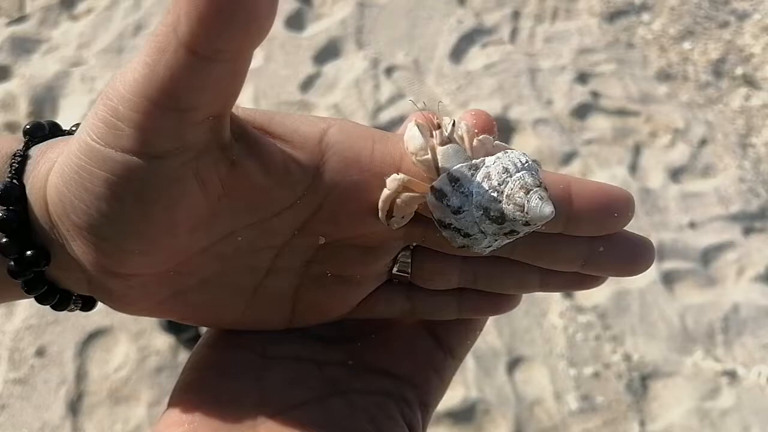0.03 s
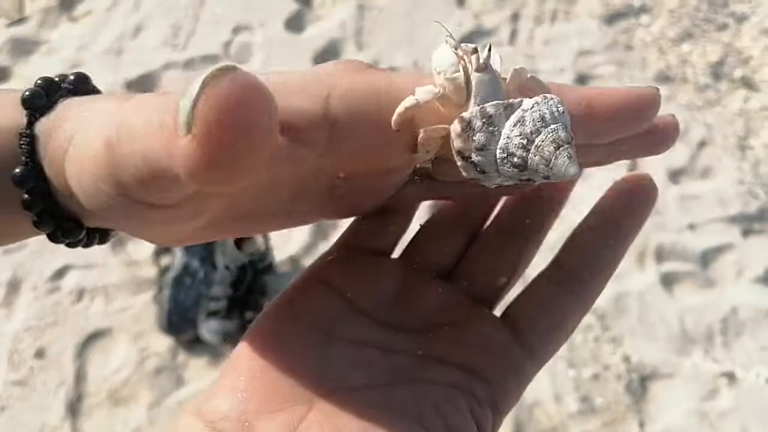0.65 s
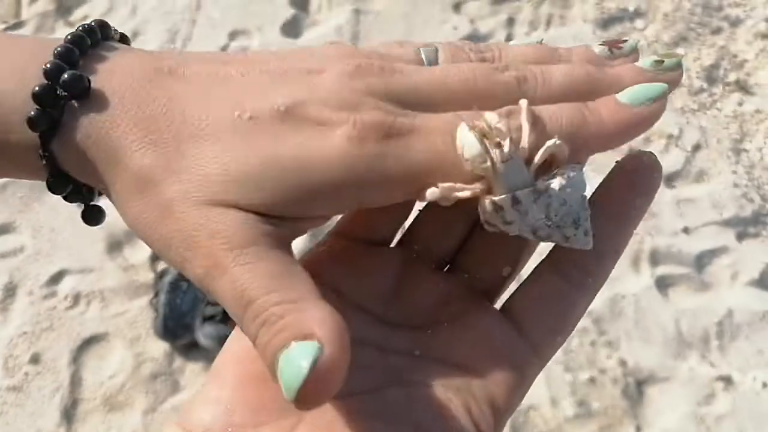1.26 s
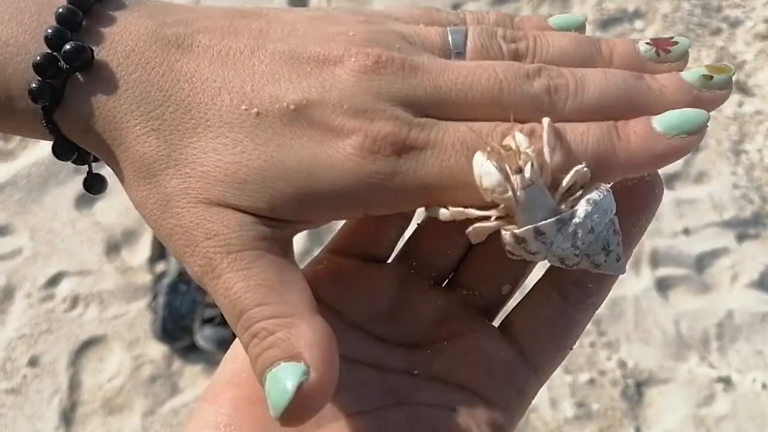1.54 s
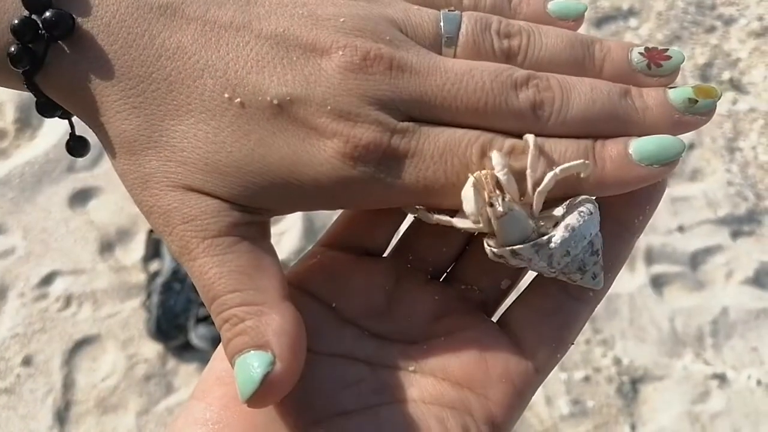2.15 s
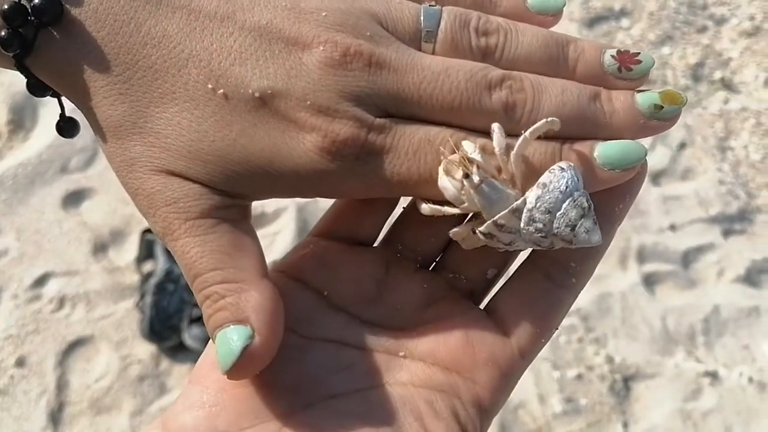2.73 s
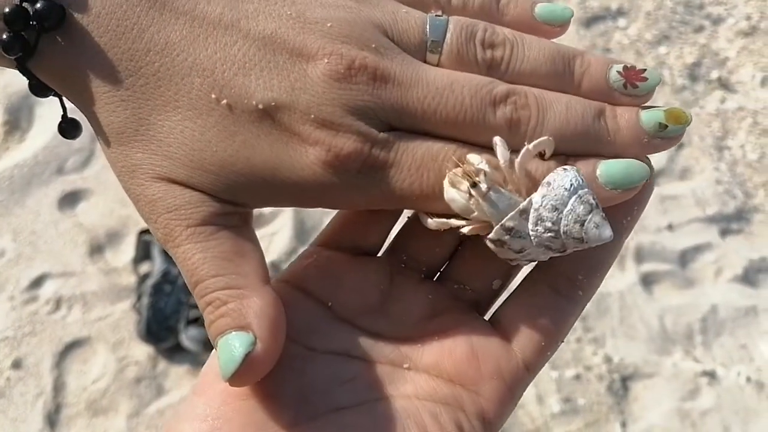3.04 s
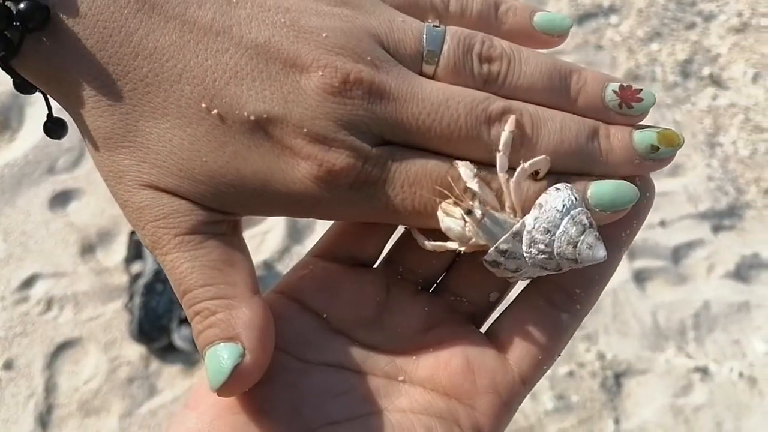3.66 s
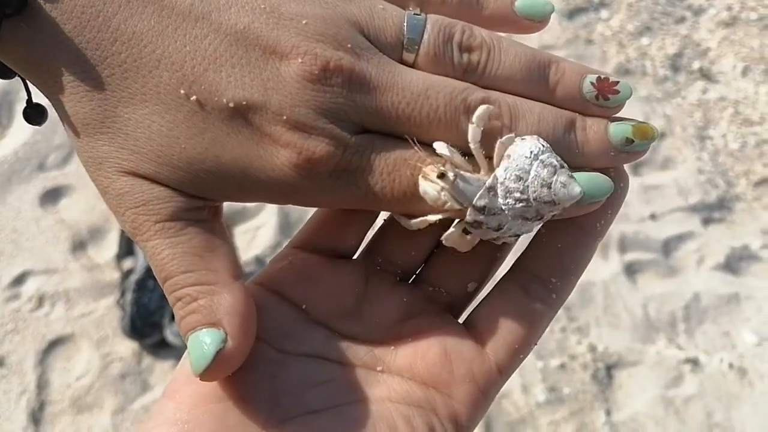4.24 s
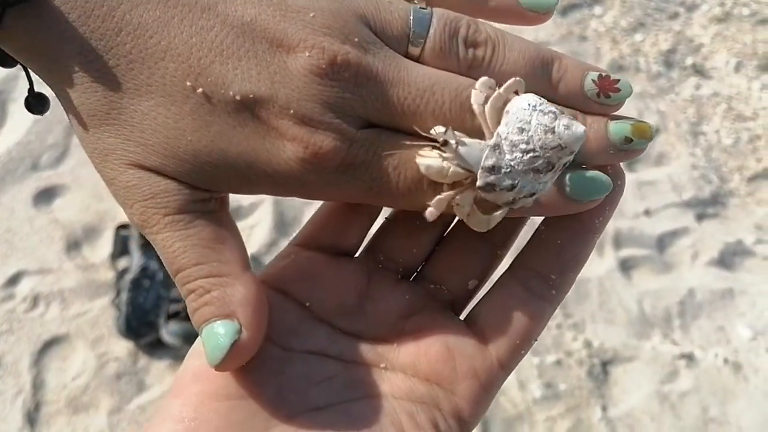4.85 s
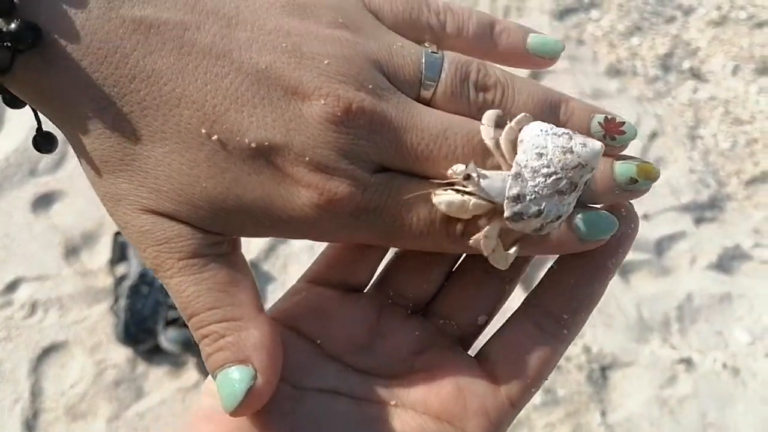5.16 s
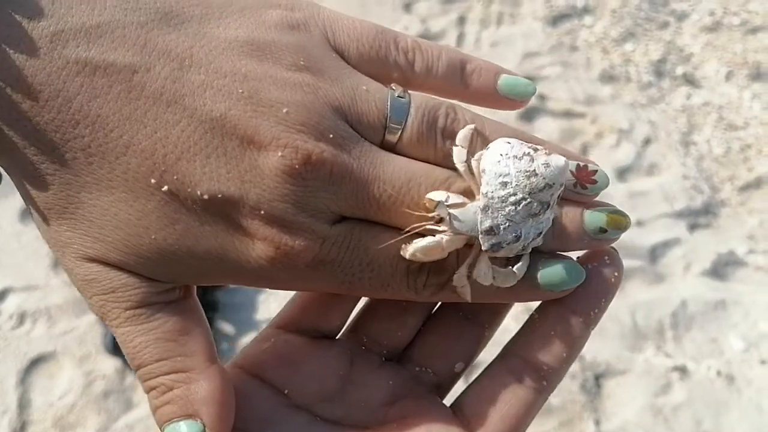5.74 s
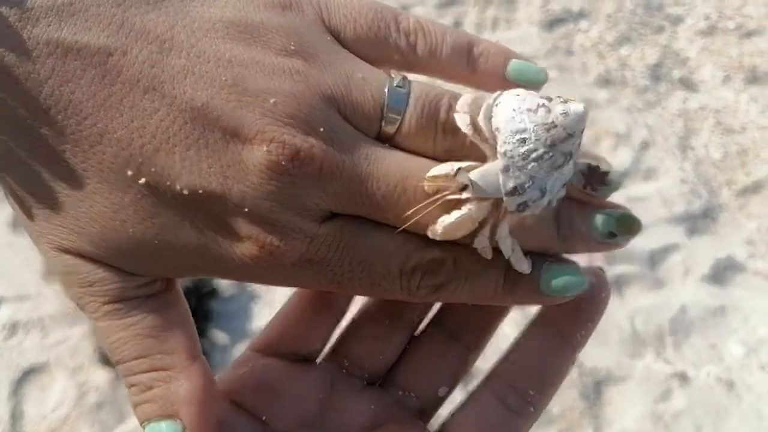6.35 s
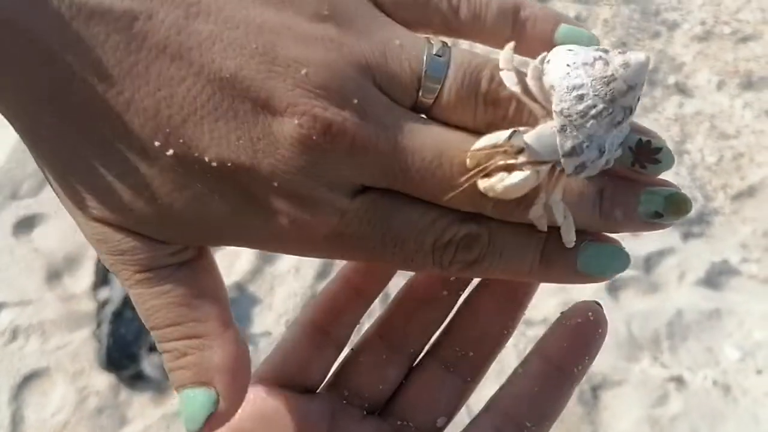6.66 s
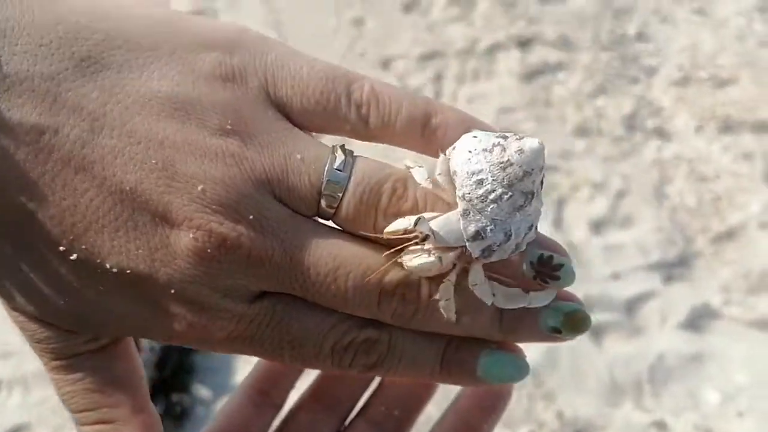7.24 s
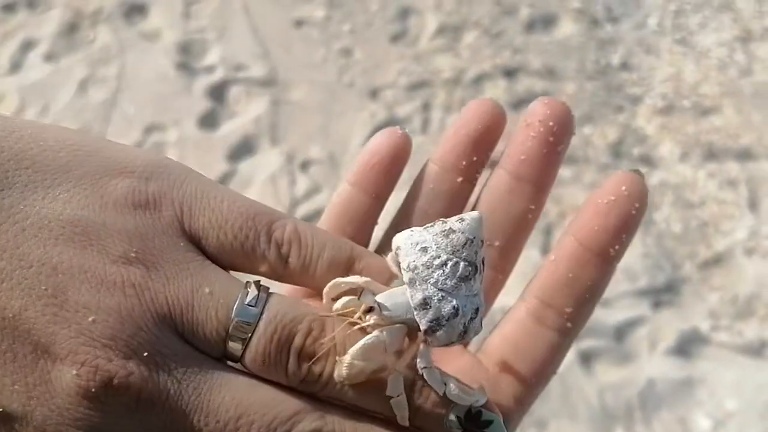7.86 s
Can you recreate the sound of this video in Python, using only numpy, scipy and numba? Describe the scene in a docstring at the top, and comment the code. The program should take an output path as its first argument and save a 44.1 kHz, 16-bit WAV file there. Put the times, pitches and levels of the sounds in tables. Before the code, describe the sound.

Small waves break and hiss on a sandy beach while gusts of wind flutter and thump against the microphone.

```python
"""Small waves on a windy, sandy beach, heard from a hand-held phone with two microphone ports.
After half a second of silence the sound opens on breaking waves: each booms, roars, washes and leaves
hissing foam, reaching one port a moment before the other. Gentler waves follow, while gusts shed eddies
across each port on its own in a low flutter. A faint tick passes at 4.3 s. From about 5.5 s the wind
stiffens, opens up and thumps; it is strongest in the final second, as one last wave breaks."""
import sys
import numpy as np
from scipy import signal
from scipy.fft import rfft, irfft
from scipy.io import wavfile
from scipy.ndimage import uniform_filter1d, minimum_filter1d
from numba import njit

SR = 44100
rng = np.random.default_rng(int(sys.argv[2]) if len(sys.argv) > 2 else 0)


def transcribe(signal):
    """Save signal, clipped to [-1, 1], as a 16-bit WAV file at the path in sys.argv[1]."""
    frames = np.atleast_2d(signal).T
    limited = np.clip(frames, -1, 1)
    pcm = np.round(limited * 32767).astype(np.int16)
    wavfile.write(sys.argv[1], SR, pcm)


N = 352800
TIME = np.arange(N) / SR
SLOW_TIME = TIME[::100]  # coarse clock for slow envelopes
FREQ = np.maximum(np.arange(N // 2 + 1) * SR / N, 1)

# gusts that strike one port: (time [s], port [-1 left, 1 right], level [dB], half length [s])
GUSTS = [(0.64, 1, -32.5, 0.019), (.648, -1, -44, 0.03), (0.98, 1, -41.5, 0.078), (1.29, -1, -45, .03),
         (1.441, -1, -45, 0.038), (1.68, -1, -37.5, 0.014), (1.753, 1, -39, .03), (1.92, -1, -42, 0.04),
         (2.004, -1, -41.5, .015), (2.036, -1, -38, .015), (2.218, 1, -40, 0.026),
         (2.343, -1, -41.5, 0.028), (2.448, 1, -43.5, 0.015), (2.681, -1, -41.5, .025),
         (3.133, -1, -36.5, .016), (3.32, 1, -45, 0.023), (3.623, 1, -43, 0.019), (3.893, -1, -34.5, .022),
         (4.003, -1, -38.5, .06), (4.181, 1, -40, 0.035), (4.236, -1, -42.5, 0.023),
         (4.47, -1, -42.5, 0.047), (4.74, 1, -42.5, 0.028), (5.208, -1, -45, 0.013), (5.251, 1, -40, .04),
         (5.418, 1, -38.5, 0.018), (5.468, 1, -39.5, .025), (5.576, 1, -41.5, 0.014), (5.635, 1, -30, .04),
         (5.718, 1, -33.5, 0.018), (5.809, -1, -32, 0.016), (5.845, 1, -32, 0.038), (6.094, 1, -37, 0.019),
         (6.125, -1, -41, 0.045), (6.207, 1, -36, 0.026), (6.42, 1, -37, 0.045), (6.556, -1, -40.5, 0.053),
         (6.69, 1, -41, 0.052), (7.035, -1, -45, 0.033), (7.238, -1, -33, .018), (7.28, -1, -31, .018),
         (7.296, 1, -32, 0.062), (7.393, -1, -26.5, 0.022), (7.451, 1, -29, 0.037), (7.581, 1, -25, .013),
         (7.672, -1, -34, 0.035), (7.719, 1, -30, 0.021), (7.79, -1, -34.5, 0.021),
         (7.848, 1, -35.5, 0.019), (7.965, 1, -35.5, 0.032)]
# breaking waves: (crest [s], rise [s], hold [s], fall [s], side [-1 left to 1 right],
# boom [dB], roar [dB], wash [dB], foam [dB], peak pitch [Hz], hollow pitch [Hz])
WAVES = [(.42, 0.067, 0.29, .2, -0.24, 13.5, 6, 12.5, 14, 5850, 1500),
         (0.746, 0.1, .13, .42, 0.13, 10, 5.5, 9, 8, 1900, 4300),
         (1.307, .13, 0.31, 1.14, -0.7, 1.4, 0, 3, -1.5, 6100, 2130),
         (2.31, 0.13, 0.045, 0.72, -0.82, -5, -2.5, 0.5, -1, 4360, 570),
         (2.89, .33, 0.44, 0.23, -0.42, -0.5, 2.5, 1.5, 0.5, 7600, 600),
         (3.332, 0.13, 0.6, 0.074, 0.13, 3.2, -2, 2.5, -1.5, 3000, 1390),
         (3.72, .08, .14, .04, .1, -6, -5, 0, -5, 2800, 1400),
         (3.994, 0.17, 0.23, 0.68, -0.18, 0.5, -8, 0.8, -3, 2800, 1450),
         (5.02, 0.97, .35, 0.46, 0.81, -3.5, -4.5, 1.5, -1.1, 5480, 470),
         (5.676, 0.12, 0.23, 0.3, 0.47, -3, -7, -3, -6, 600, 900),
         (6.364, 0.14, .14, .16, -1.04, 2.5, 3, 3.5, 5, 3210, 9900),
         (6.775, 0.32, 0.12, .85, .9, -10.5, -11.5, -7.5, -4, 1350, 670),
         (7.886, .14, .15, 0.21, -0.16, 8, 5.5, 9, 4.5, 2700, 1700)]


def undb(db):
    """Decibels to gain."""
    return 10 ** (np.asarray(db) / 20)


def curves(table):
    """The columns of a table, joined by straight lines in time."""
    times, *columns = np.transpose(table)
    return np.array([np.interp(TIME, times, column) for column in columns])


def spectra(table, hz=FREQ):
    """The columns of a table, joined by straight lines in log frequency."""
    points, *columns = np.transpose(table)
    return np.array([np.interp(np.log(hz), np.log(points), column) for column in columns])


def walk(rate_hz):
    """A smooth random wobble: levels held 1 / rate_hz seconds and slewed twice, spread near 1."""
    step = max(int(SR / rate_hz), 1)
    held = np.repeat(rng.standard_normal(N // step + 2), step)
    slewed = uniform_filter1d(uniform_filter1d(held, step), step)
    return 1.3 * slewed[rng.integers(step):][:N]


def steady(x, span_s):
    """Hold a noise near rms 1 over spans of this length, keeping its faster flutter."""
    span = max(int(span_s * SR), 1)
    return x / np.sqrt(uniform_filter1d(uniform_filter1d(x ** 2, span), span) + 1e-18)


@njit
def lowpass(x, hz, damping):
    """State-variable low-pass whose corner and damping move every sample."""
    y, band, low = np.empty(len(x)), 0., 0.
    for i in range(len(x)):
        g = np.tan(np.pi * hz[i] / SR)
        v = (band + g * (x[i] - low)) / (1 + g * (g + damping[i]))
        y[i] = low + g * v
        band, low = 2 * v - band, 2 * y[i] - low
    return y


def sand_tick(at_s=4.2812, left_db=-45, right_db=-53, decay_s=0.00032, low_cut_hz=7000):
    """A faint, bright tick, like a grain of sand blown against the phone."""
    age = TIME - at_s
    burst = rng.standard_normal((2, N)) * (age > 0) * np.exp(-np.abs(age) / decay_s)
    low_cut = signal.butter(2, low_cut_hz, "high", fs=SR, output="sos")
    return undb([[left_db], [right_db]]) * signal.sosfilt(low_cut, burst)


def wind_pressure(port, waver_db=4.0, waver_hz=15):
    """Wind level in dB at one port: a wavering breeze, and gusts that swell and pass."""
    # the breeze, and which port faces it: (time [s], level [dB], right minus left [dB])
    breeze = [(.5, -53, 2), (1.05, -51.5, 6), (1.25, -56, -6), (2.3, -53.5, -3), (2.95, -57, 5),
              (3.2, -52.5, 2), (4.25, -52.5, 1), (4.6, -56.5, -4), (5.1, -53.5, -1), (5.4, -46, 3.5),
              (6.0, -51, 8), (6.7, -54.5, 9.5), (7.17, -53, -8), (7.3, -40.5, -2.5), (8, -40, 5.5)]
    breeze_db, facing_db = curves(breeze)
    breeze_power = undb(breeze_db + port * facing_db / 2 + waver_db * walk(waver_hz)) ** 2
    gust_power = sum((undb(db) * np.exp(-((SLOW_TIME - at_s) / half_s) ** 2 / 2)) ** 2
                     for at_s, struck, db, half_s in GUSTS if struck * port > 0)
    return 10 * np.log10(breeze_power + np.interp(TIME, SLOW_TIME, gust_power))


def wind_flutter(pressure_db, colour_db, corner_hz=235, usual_db=-40, db_per_octave=23,
                 clump_db=5.5, usual_damping=1.46, damping_per_db=0.03, trim_db=1.54):
    """Eddies pass one port in clumps; faster air makes them louder, shorter and more alike in size."""
    eddies = rng.standard_normal(N) * undb(clump_db * walk(rate_hz=90))
    body = irfft(rfft(eddies) * undb(colour_db), N)
    excess_db = pressure_db - usual_db
    corner = np.clip(corner_hz * 2 ** (excess_db / db_per_octave), 60, 900)
    # a stiff gust sheds eddies more regularly, so the rumble peaks just under its corner
    damping = np.clip(usual_damping - damping_per_db * excess_db, .6, 2)
    rumble = lowpass(lowpass(body, corner, damping), corner, damping)
    return steady(rumble, span_s=0.034) * undb(pressure_db + trim_db)


def buffets(over_gust_db=9, usual_hz=92, usual_db=-40, db_per_octave=19, core_ratio=2.4, core_db=-15):
    """A gust's vortex thumps: a pressure spike between two shallow troughs, tighter in faster air."""
    thumps = np.zeros((2, N))
    for at_s, port, db, _ in GUSTS:
        hz = usual_hz * 2 ** ((db - usual_db) / db_per_octave)
        near = np.abs(TIME - at_s) < 2 / hz
        phase_squared = (np.pi * hz * np.outer([1, core_ratio], TIME[near] - at_s)) ** 2
        swirl, core = (1 - 2 * phase_squared) * np.exp(-phase_squared)
        thumps[int(port > 0), near] += undb(db + over_gust_db) * (swirl + undb(core_db) * core)
    return thumps


def bubble_noise(left_ms, right_ms):
    """Noise of countless bubbles from one direction, with its delay to each port."""
    delay_s = np.array([[left_ms], [right_ms]]) / 1000
    return irfft(rfft(rng.standard_normal(N)) * np.exp(-2j * np.pi * FREQ * delay_s), N)


def sea_at_ports(side, width=1.07):
    """Spectra of the sea at the two ports: surf from either side of the shore, and a diffuse rest."""
    # the sea's base colour at each port: (frequency [Hz], left [dB], right [dB])
    sea_colour = [(80, -82.5, -79.5), (322, -82, -82.5), (630, -80, -79), (975, -81.5, -81.5),
                  (1380, -92.9, -85.5), (2130, -92.5, -85.5), (2640, -94, -84), (3260, -96.5, -87.5),
                  (3740, -101.4, -96), (5600, -97, -95.5), (6500, -100, -95), (7070, -93.5, -95),
                  (8630, -109.6, -107.5), (12500, -118.9, -116.6), (16000, -119.6, -110.5)]
    # sound that arrives straight from the shore: (frequency [Hz], share of power [0-1])
    direct_share = [(100, 0.94), (600, 0.9), (1500, 0.52), (3500, 0.43), (7000, 0.28), (12000, 0)]
    left_share = np.clip(.5 - width * side, 0, 1)
    from_left = np.sqrt(left_share) * bubble_noise(left_ms=0, right_ms=0.3)
    from_right = np.sqrt(1 - left_share) * bubble_noise(left_ms=0.376, right_ms=0)
    share = np.clip(spectra(direct_share), 0, 1)
    direct = np.sqrt(share) * rfft(from_left + from_right)
    diffuse = np.sqrt(1 - share) * rfft(rng.standard_normal((2, N)))
    return (direct + diffuse) * undb(spectra(sea_colour)) * np.sqrt(SR / 2)


def wave_power():
    """Each wave swells, holds and dies away, its low parts last to arrive: power by wave, part, time."""
    # how boom, roar, wash and foam follow the crest: (delay [s], hold [ratio], fall [ratio])
    part_timing = [(0.087, 1.41, 0.56), (0.078, 0.93, 0.65), (0.0027, 0.87, 1.24), (0.015, 0.91, 1.36)]
    delay_s, hold_ratio, fall_ratio = np.transpose(part_timing)[:, :, None]
    power = []
    for crest_s, rise_s, hold_s, fall_s, _, *part_db, _, _ in WAVES:
        age = SLOW_TIME - crest_s - delay_s
        attack = np.maximum(-age, 0) / rise_s
        release = np.maximum(age - hold_s * hold_ratio, 0) / (fall_s * fall_ratio)
        power.append((undb(part_db)[:, None] * np.exp(-attack - release)) ** 2)
    return np.array(power)


def wave_tone(hz, peak_db=3.0, peak_octaves=0.22, hollow_db=-5.0, hollow_octaves=0.58):
    """Each wave's own EQ in dB at this pitch: a narrow peak and a broad hollow."""
    from_peak, from_hollow = np.log2(hz / np.array(WAVES)[:, -2:].T)
    peak = peak_db * np.exp(-(from_peak / peak_octaves) ** 2)
    hollow = hollow_db * np.exp(-(from_hollow / hollow_octaves) ** 2)
    return peak + hollow


def surf(churn_db=.5, drift_db=0.6, flicker_db=1.22, trim_db=-0.42):
    """Plunging water booms, big bubbles roar, small ones wash and foam hisses."""
    # bed of distant surf between the waves: (boom [dB], roar [dB], wash [dB], foam [dB])
    far_surf_db = [-17, -7.5, -15.5, -9]
    # the phone's body colours a wave from the right, and one from the left the opposite way:
    # (frequency [Hz], left port [dB], right port [dB])
    body_shade = [(282, -3.5, 2.3), (496, -3.5, 8.5), (770, -6, 3.5), (1140, -4, -0.5), (1590, 2.2, -2.5),
                  (2500.0, 0.5, -5.5), (4300.0, 3, -4.0), (5600.0, 1.5, -2.2), (7200.0, 5.5, 0.5),
                  (9000.0, 2.5, -3), (13000.0, 0, -2.0)]
    # the part a band belongs to: (frequency [Hz], boom [0-1], roar [0-1], wash [0-1], foam [0-1])
    parts = [(400, 1, 0, 0, 0), (700, 0, 1, 0, 0), (950, 0, 1, 0, 0),
             (1700, 0, 0, 1, 0), (3000, 0, 0, 1, 0), (5000, 0, 0, 0, 1)]
    power, sides = wave_power(), np.array(WAVES)[:, 4]
    # the sea is heard from where its loudest waves are
    weight = power.sum(axis=1) + 1e-18
    sea = sea_at_ports(np.interp(TIME, SLOW_TIME, sides @ weight / weight.sum(axis=0)))
    centres_hz = np.geomspace(280, 13000, 20)
    # all bands churn together; each drifts and flickers alone
    mix, churn = 0, churn_db * walk(rate_hz=22)
    for hz, solo in zip(centres_hz, np.eye(len(centres_hz))):
        band = irfft(sea * np.interp(FREQ, centres_hz, solo), N)
        blend = spectra(parts, hz)
        colour = undb(np.outer(spectra(body_shade, hz), sides) + wave_tone(hz)) ** 2
        port_power = colour @ (blend @ power) + undb(blend @ far_surf_db) ** 2
        swell = np.array([np.interp(TIME, SLOW_TIME, level) for level in np.sqrt(port_power)])
        motion_db = churn + drift_db * walk(rate_hz=3.146) + flicker_db * walk(rate_hz=35)
        mix = mix + band * swell * undb(trim_db + motion_db)
    return mix


def scene():
    """The sea all around, separate wind on each port, and one faint tick."""
    # body of the wind's flutter at each port: (frequency [Hz], left [dB], right [dB])
    flutter_colour = [(10, -12, -10), (25, -10, -6), (50, -2.5, 0), (90, 0.5, 1.5), (130, 2, 0.5),
                      (199, -2.5, -2), (346, -7.5, -9.5), (700, -6.5, -14)]
    wind = np.array([wind_flutter(wind_pressure(port), colour_db)
                     for port, colour_db in zip((-1, 1), spectra(flutter_colour))])
    return surf() + wind + buffets() + sand_tick()


def gain_control(x, threshold_db=-35, slope=0.24, sense_s=0.032, hold_s=0.327):
    """The phone ducks both channels when either gets loud, and holds that for a moment."""
    sense, half_hold = int(sense_s * SR), int(hold_s * SR / 2)
    level_db = 10 * np.log10(np.abs(uniform_filter1d(x ** 2, sense)).max(axis=0) + 1e-18)
    gain_db = -slope * np.maximum(level_db - threshold_db, 0)
    held_db = minimum_filter1d(gain_db, 2 * half_hold + 1, origin=half_hold)
    return x * undb(uniform_filter1d(held_db, sense))


def record(dry):
    """The microphone opens abruptly after a short silence; loud moments duck the level; the top is cut."""
    open_s, fade_s, top_hz = .476, .002, 15300
    opened = np.clip((TIME - open_s) / fade_s, 0, 1)
    high_cut = signal.ellip(10, .2, 80, top_hz, fs=SR, output="sos")
    return signal.sosfilt(high_cut, gain_control(dry * opened))


dry = scene()
out = record(dry)
transcribe(out)
```